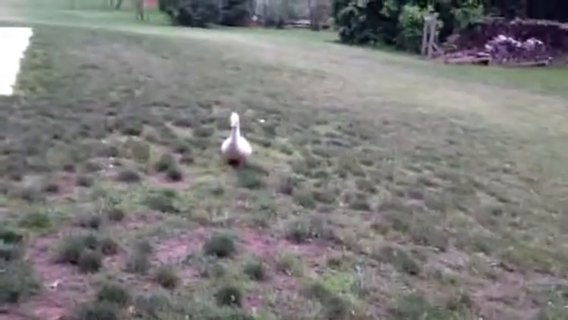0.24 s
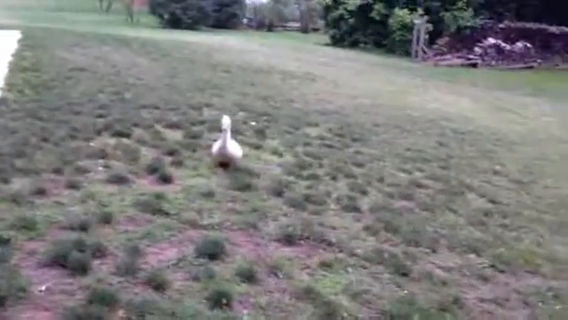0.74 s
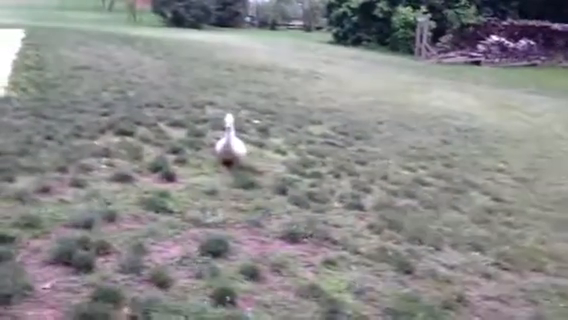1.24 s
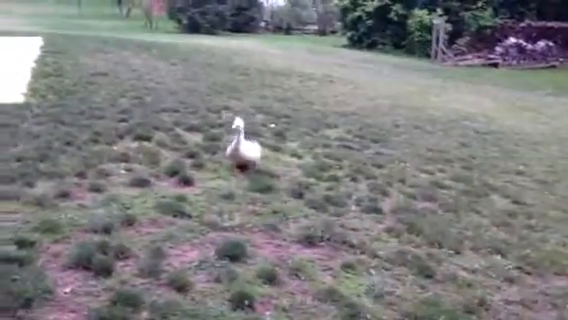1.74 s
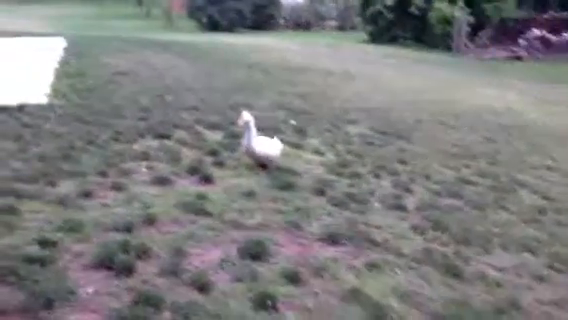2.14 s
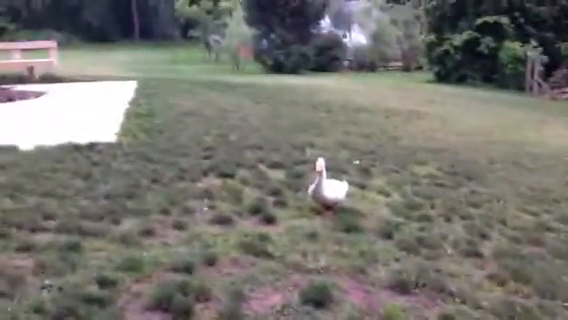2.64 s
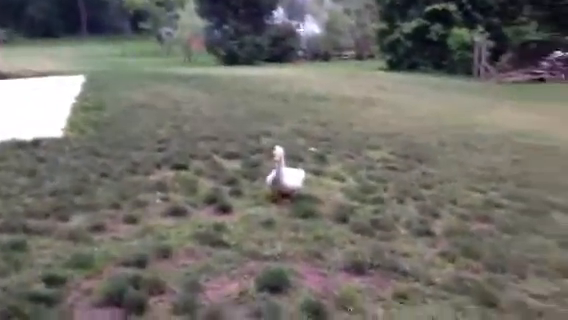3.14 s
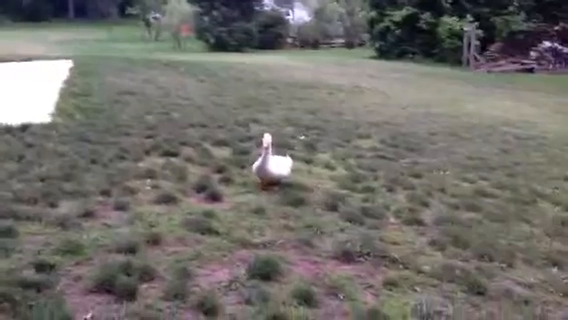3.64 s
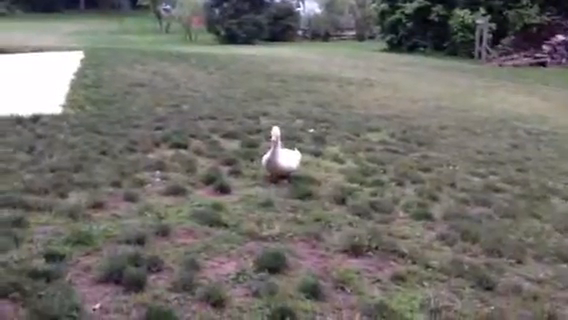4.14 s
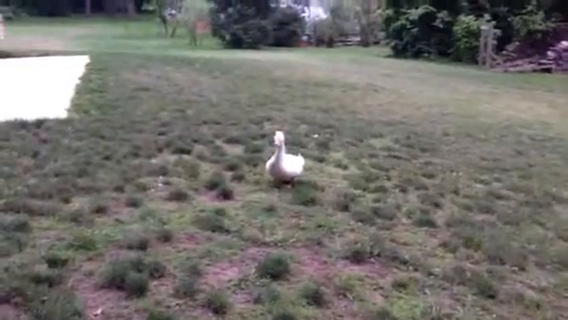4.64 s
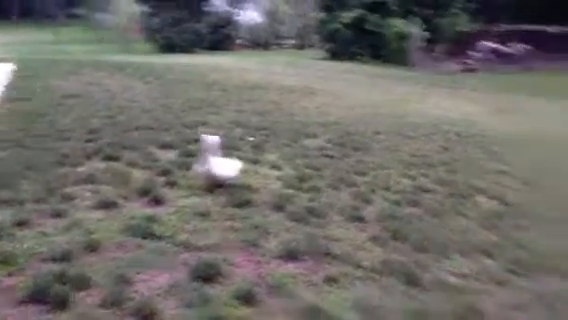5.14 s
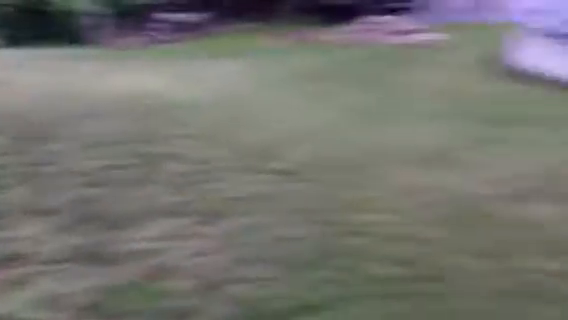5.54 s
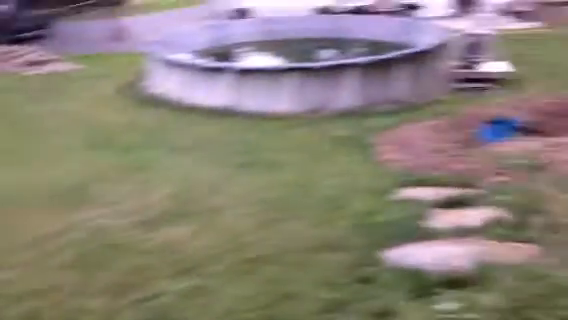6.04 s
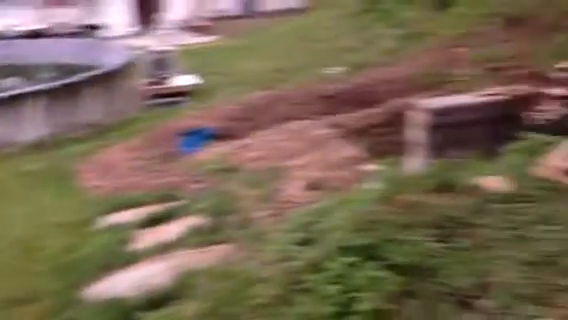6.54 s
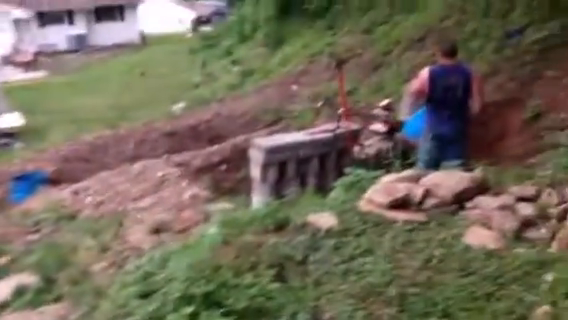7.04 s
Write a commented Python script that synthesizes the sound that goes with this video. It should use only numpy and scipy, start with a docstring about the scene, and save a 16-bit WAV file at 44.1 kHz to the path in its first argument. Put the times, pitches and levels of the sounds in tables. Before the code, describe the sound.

Six evenly spaced, rasping duck quacks outdoors, mixed with scattered tool clacks, light taps and dull bumps over a low rumble.

```python
"""A white duck on a lawn gives six long, rasping quacks: slow pulses from its syrinx ring the throat,
and the tone brightens as the bill opens. The last is heard from aside, duller, its pulses more smeared.
Work in the yard adds sharp clacks that echo off the houses; light ticks and a few dull, close bumps
stay dry. Underneath is a bed of low outdoor rumble, rustling leaves, a machine's hum and microphone
hiss, with faint songbirds and a soft drone that swells midway."""
import sys
import numpy as np
from scipy import signal
from scipy.fft import rfft, irfft, next_fast_len
from scipy.io import wavfile
from scipy.ndimage import uniform_filter1d, map_coordinates

SR = 44100
rng = np.random.default_rng(int(sys.argv[2]) if len(sys.argv) > 2 else 0)


def wav_out(sig):
    """Save sig, one row per channel (or a flat mono array), as 16-bit PCM at SR to the path in sys.argv[1]."""
    wavfile.write(sys.argv[1], SR, np.round(np.clip(np.atleast_2d(sig).T, -1, 1) * 32767).astype(np.int16))


N = 321489

# Tone of the rumble, the leaves and the hiss. Each row: frequency in Hz, relative level in dB.
RUMBLE_SPECTRUM = [(15, -60), (25, -36), (86, -18.5), (99, -14.5), (119, 1), (145, -1), (172, -7.5),
                   (300, -1.5), (350, -9), (421, -5.5), (484, -12), (1000, -25.5), (1300, -59),
                   (2200, -120)]
LEAF_SPECTRUM = [(500, -13), (900, 1), (1700, 2.5), (2500, 2.5), (3800, 0.5), (5000, 1), (7000, -4.5),
                 (12000, -13.5)]
HISS_SPECTRUM = [(100, 6), (3000, -26), (8000, -4.5), (15000, -3.5)]
# Slow fader rides for the rumble and the leaves. Each row: time in seconds, fader level in dB.
RUMBLE_RIDE = [(0.0, -61), (0.55, -55.5), (1.26, -65), (1.52, -63), (1.68, -59.5), (1.95, -59), (2.46, -64),
               (3.39, -61), (3.65, -64), (4.12, -61), (5.04, -61.5), (5.32, -65), (5.56, -62), (6.21, -58),
               (6.56, -62), (7.29, -60.5)]
LEAF_RIDE = [(0, -72), (.7, -65), (1.4, -69.5), (2.6, -66), (3.15, -69.5), (4.1, -69), (5.1, -66),
             (5.45, -69.5), (6.3, -68), (7.29, -65)]
# The machine's hum. Each row: frequency in Hz, level in dB.
HUM_PARTIALS = [(120.3, -67.5), (180.5, -73)]

# Tool blows. Each row: start in seconds, peak in dB, tuning ratio of the body, relative treble in dB,
# steel ring in dB, frequency in Hz where the steel rings most, echo send in dB.
CLACK_HITS = [(.003, -44.5, 1.14, 8, -13, 3000, 3), (2.3799, -27.5, 1.025, 5, -18, 3200, 1),
              (3.271, -52, 1.0, -5, -27, 3000, -7), (4.353, -47.5, 1.01, 3.5, -15, 3000, 11.5),
              (4.364, -39.5, 1.29, 4, -30, 3000, -8), (4.957, -40.5, 1.2, -2, -23, 3000, -4),
              (5.097, -41, 1.05, -1, -30, 3000, -7.5), (5.171, -47.5, 0.79, 0, -25, 3000, -8),
              (6.475, -39, 1.37, 12, 0, 2800, 1), (6.493, -34.5, 1.07, 19, -12, 5000, -2),
              (6.531, -37, 1.26, 9, 2.5, 5600, -2.5)]
# Body and bright crack of the struck thing. Each row: frequency in Hz, width in Hz, level in dB.
BODY_MODES = [(576, 200, 3.5), (1550, 830, 1.5), (1955, 260, 16.5), (3250, 450, 7), (4570, 520, -11)]
CRACK_MODES = [(2620, 3900, 7), (4900, 600, 0.5), (6200, 390, -0.5), (8800, 1600, -57)]
# Ring of the steel tool. Each row: frequency in Hz, level in dB, seconds to fall 60 dB.
STEEL_MODES = [(2537, -14, 0.13), (3250, 1, 0.067), (5500, -7, 0.067)]
# The yard's reverb tail. Each row: frequency in Hz, seconds to fall 60 dB.
YARD_DECAY = [(200, 0.49), (2000, 0.39), (5000, 0.44), (10000, 0.18)]

# Songbird phrases on one repeated note. Each row: start in seconds, note count, spacing in seconds,
# note length in seconds, opening pitch in Hz, closing pitch in Hz, level in dB.
BIRD_PHRASES = [(0.062, 1, 0, 0.057, 1820, 1650, -66), (1.27, 1, 0, 0.026, 5220, 5480, -61.5),
                (3.997, 1, 0, 0.18, 3550, 3950, -69.5), (6.006, 1, 0, .17, 1805, 1500, -66),
                (6.153, 3, 0.042, .03, 4900, 4510, -65.5), (6.73, 3, 0.033, 0.027, 4910, 4380, -61.5),
                (6.468, 4, 0.24, 0.038, 1820, 2025, -57.5), (6.798, 2, .243, .052, 3000, 2380, -57.5)]

# Small dry taps. Each row: start in seconds, peak in dB, pitch in Hz, click against ring in dB.
TICK_HITS = [(.508, -54.5, 850, -21.5), (.630, -49, 1140, -5), (1.175, -43, 1060, 1.5),
             (1.616, -48.5, 980, 0), (2.591, -47, 1256, -2), (3.525, -47.5, 1090, 0),
             (5.454, -48.5, 1670, 4), (6.208, -53, 960, -9), (6.495, -33.5, 1010, -3),
             (6.732, -48, 1280, -14), (6.798, -49, 1290, -16), (6.92, -52, 1352, -16),
             (7.0996, -33, 914, -14), (7.162, -38.5, 1420, -6.5)]
# A tick's ring. Each row: multiple of its pitch, width in Hz, level in dB.
TICK_RING = [(1, 230, 3.5), (1.57, 290, -2)]
# A tick's contact click. Each row: frequency in Hz, width in Hz, level in dB.
CLICK_MODES = [(2600, 1100, 3), (4330, 2400, -3)]

# The duck's calls. Each row: start in seconds, length in seconds, level in dB, bill opening time in
# seconds, wide-open brightness in dB, rasp in dB, top pulse rate in Hz, boost of the lowest throat mode
# in dB, wide-open throat boost in dB, 1 for facing us or 0 for aside.
QUACK_CUES = [(0.648, .44, -40.5, 0.19, -1.5, -8.5, 91.03, 6, 0.5, 1),
              (1.659, .46, -41, .18, -2.5, -8, 93.44, 3, 1, 1),
              (2.621, .448, -39.5, .18, -2.5, -6, 91.9, -1, 1, 1),
              (3.541, 0.39, -39, 0.18, -3, -7.5, 92.3, 0.5, 0, 1),
              (4.47, 0.43, -39.5, .205, -3.5, -7.5, 91.84, 1, 0, 1),
              (5.472, 0.49, -42, 0.17, -5, -11, 102, 0, -3, 0)]
# Resonances of the throat, the open bill and the windpipe's high rasp, the last two from the front
# and from aside. Each row: frequency in Hz, width in Hz, level in dB.
THROAT_MODES = [(1213, 91, -5.5), (1439, 186, 3.5), (1787, 114, 6.5)]
BILL_FRONT_MODES = [(2236, 51, 2), (2426, 275, 1), (2828, 136, -1.5), (3300, 165, -11)]
BILL_ASIDE_MODES = [(2150, 300, -8.5), (2454, 130, -10), (2876, 180, -3.5), (3340, 270, -7)]
RASP_FRONT_MODES = [(3960, 200, -4), (4500, 310, 5.5), (4926, 230, -2.5), (5720, 400, -15),
                    (7750, 3200, -33)]
RASP_ASIDE_MODES = [(4580, 490, 7), (4960, 365, -12)]

# Dull, close bumps. Each row: start in seconds, peak in dB, pitch in Hz.
BUMP_HITS = [(1.175, -45.5, 190), (2.381, -38, 520), (2.396, -38.5, 195), (3.318, -47, 157),
             (4.367, -40, 320), (4.971, -41, 249), (6.498, -26.5, 213), (7.099, -38, 217)]
# The low drone. One row: crest time and spread in seconds, centre and width in Hz, crest level in dB.
DRONE_BAND = (4, 1.1, 166.5, 26, -63.5)


def amp(db):
    """Decibels to gain."""
    return 10 ** (np.asarray(db) / 20)


def unit(x):
    """Normalise to rms 1."""
    return x / np.sqrt(np.mean(x ** 2) + 1e-20)


def peaked(x):
    """Normalise to peak 1."""
    return x / np.abs(x).max()


def along(points, hz):
    """Read (Hz, value) points on a log frequency axis."""
    freqs, values = np.transpose(points)
    return np.interp(np.log(hz + 1), np.log(freqs), values)


def wobble(rate):
    """Smooth random modulation with `rate` knots a second."""
    knots = rng.standard_normal(int(N * rate / SR) + 4)
    return map_coordinates(knots, [np.arange(N) * rate / SR])


def filtered(x, response):
    """EQ a track with a gain that is a function of frequency."""
    size = next_fast_len(N + SR // 4)
    return irfft(rfft(x, size) * response(np.fft.rfftfreq(size, 1 / SR)), size)[:N]


def noise(spectrum):
    """Coloured noise at rms 1."""
    return unit(filtered(rng.standard_normal(N), lambda hz: amp(along(spectrum, hz))))


def resonate(x, modes, size=4096):
    """Ring x through steep-sided resonances, each given as (Hz, width in Hz, dB)."""
    f = np.fft.rfftfreq(size, 1 / SR)
    gain = sum(amp(db) * (f * width) ** 2 / ((hz * hz - f * f) ** 2 + (f * width) ** 2)
               for hz, width, db in modes)
    # minimum phase, so nothing rings ahead of the hit
    cepstrum = irfft(np.log(gain + 1e-4))
    cepstrum[1:size // 2] *= 2
    cepstrum[size // 2 + 1:] = 0
    return signal.fftconvolve(x, irfft(np.exp(rfft(cepstrum))))[:len(x)]


def burst(t60, size=4096):
    """Contact noise that falls 60 dB in t60 seconds."""
    return rng.standard_normal(size) * amp(-60 * np.arange(size) / SR / t60)


def add(track, start, sound):
    """Mix a sound into the track, `start` seconds in."""
    part = track[max(0, round(start * SR)):][:len(sound)]
    part += sound[:len(part)]


def outdoor_bed(rumble_trim_db=-0.25, hiss_db=-70):
    """Swelling rumble, fluttering leaves, a machine's slightly drifting hum and microphone hiss."""
    t = np.arange(N) / SR
    rumble_db = np.interp(t, *np.transpose(RUMBLE_RIDE)) + rumble_trim_db
    rumble = amp(rumble_db + 1.64 * wobble(13)) * noise(RUMBLE_SPECTRUM)
    leaves_db = np.interp(t, *np.transpose(LEAF_RIDE))
    leaves = amp(leaves_db + 1.27 * wobble(22)) * noise(LEAF_SPECTRUM)
    drifting_t = t + 0.00016 * wobble(3.28)
    hum = np.sqrt(2) * sum(amp(db) * np.sin(2 * np.pi * hz * drifting_t) for hz, db in HUM_PARTIALS)
    hum *= amp(1.2 * wobble(1.3))
    return rumble + leaves + hum + amp(hiss_db) * noise(HISS_SPECTRUM)


def steel_ring(favoured_hz, fall_db_per_octave=4):
    """The tool's steel rings briefly; modes far from the frequency a blow favours ring less."""
    t = np.arange(4096) / SR
    ring = np.zeros(len(t))
    for hz, db, t60 in STEEL_MODES:
        struck_db = db - fall_db_per_octave * abs(np.log2(hz / favoured_hz))
        ring += amp(struck_db - 60 * t / t60) * np.sin(2 * np.pi * hz * t)
    return unit(ring)


def clacks(crack_trim_db=-8.5):
    """Hard tool blows layer body, crack and steel ring, and echo around the yard."""
    direct, send = np.zeros(N), np.zeros(N)
    for start, db, tuning, treble_db, steel_db, favoured_hz, echo_db in CLACK_HITS:
        modes = [(hz * tuning, width, level) for hz, width, level in BODY_MODES]
        body = unit(resonate(burst(t60=.035), modes))
        crack = amp(treble_db + crack_trim_db) * unit(resonate(burst(t60=.04), CRACK_MODES))
        steel = amp(steel_db) * steel_ring(favoured_hz)
        blow = amp(db) * peaked(body + crack + steel)
        add(direct, start, blow)
        add(send, start, amp(echo_db) * blow)
    return direct + yard_echo(send)


def yard_echo(send, build_s=0.0059):
    """Houses and trees return a diffuse tail, each frequency dying at its own speed."""
    hz, t, spectrum = signal.stft(rng.standard_normal(SR // 2), SR, nperseg=256)
    decay = amp(-60 * t / along(YARD_DECAY, hz)[:, None])
    fade_in = 1 - np.exp(-t / build_s)
    _, tail = signal.istft(spectrum * decay * fade_in, SR, nperseg=256)
    return signal.fftconvolve(send, tail / np.linalg.norm(tail))[:N]


def songbirds(waver=0.016):
    """Distant whistled glides, single or evenly repeated, a little unsteady in pitch."""
    out = np.zeros(N)
    unsteady = 1 + waver * wobble(180)
    for first, count, spacing, length, start_hz, end_hz, db in BIRD_PHRASES:
        progress = np.linspace(0, 1, round(length * SR))
        glide = start_hz + (end_hz - start_hz) * progress
        envelope = amp(db) * np.sin(np.pi * progress)
        for start in first + spacing * np.arange(round(count)):
            pitch = glide * np.resize(unsteady[round(start * SR):], len(glide))
            add(out, start, envelope * np.sin(2 * np.pi * np.cumsum(pitch) / SR))
    return out


def ticks():
    """Light dry taps: a contact click on top of a short pitched ring."""
    out = np.zeros(N)
    for start, db, hz, click_db in TICK_HITS:
        modes = [(hz * multiple, width, level) for multiple, width, level in TICK_RING]
        click = peaked(resonate(burst(t60=.03), CLICK_MODES))
        ring = peaked(resonate(signal.unit_impulse(len(click)), modes))
        add(out, start, amp(db) * peaked(ring + amp(click_db) * click))
    return out


def bill_gape(t, length, open_s, curve=2.4, shut_lead_s=.068, shut_s=.01096):
    """The bill, from 0 shut to 1 wide: it eases open and snaps shut just before the quack ends."""
    opening = 1 - np.exp(-(t / open_s) ** curve)
    return opening / (1 + np.exp((t - length + shut_lead_s) / shut_s))


def resonance_bend(t, length, gape, scoop_s=.028, sag_s=.04):
    """Tuning ratio of the duck's resonances: they scoop up, lift with the gape and sag at the end."""
    scoop = .19 * np.exp(-t / scoop_s)
    lift = .0058 * (gape - .5)
    sag = .24 * np.exp(np.minimum(t - length, 0) / sag_s)
    waver = .008 * wobble(16)[:len(t)]
    return 1 + lift - scoop - sag + waver


def syrinx(rate_hz, jitter_s=.0005, scatter_db=1):
    """The membranes snap once a cycle, unevenly; gives each snap's sample index and strength."""
    cycles = np.flatnonzero(np.diff(np.floor(np.cumsum(rate_hz) / SR + .5)))
    shift, strength = rng.standard_normal((64, 2))[:len(cycles)].T
    snaps = cycles + (jitter_s * SR * shift).astype(int)
    return np.clip(snaps, 0, len(rate_hz) - 1), amp(scatter_db * strength)


def voice_layer(pulses, modes, rough, puff_s, smear, lag_s):
    """Snaps and their turbulent puffs ring a group of resonances; `smear` fills the gaps with noise."""
    age = np.arange(-SR // 200, SR // 200) / SR
    puffs = signal.fftconvolve(pulses, np.exp(-(age / puff_s) ** 2), "same")
    air = (puffs + smear) * rng.standard_normal(len(pulses))
    air_share = np.clip(rough, 0, 1)
    tone = np.sqrt(1 - air_share) * unit(resonate(pulses, modes))
    breath = np.sqrt(air_share) * unit(resonate(air, modes))
    sound = tone + breath
    # the steady push of air evens out the strength over a few cycles
    power = uniform_filter1d(uniform_filter1d(sound ** 2, SR // 42), SR // 80)
    sound /= np.sqrt(np.abs(power) + .08)
    return np.pad(sound, (round(lag_s * SR), 0))[:len(pulses)]


def air_push(t, length, attack_s=.024, swell_db_per_s=2, release_s=.089):
    """The breath behind a quack, as a gain: quick attack, slow swell, release and a light flutter."""
    attack_db = -22.5 * np.exp(-t / attack_s)
    swell_db = swell_db_per_s * (t - length / 2)
    release_db = -28.5 * np.clip((t - length) / release_s + 1, 0, None) ** 1.82
    flutter_db = .93 * wobble(28.8)[:len(t)]
    return amp(attack_db + swell_db + release_db + flutter_db)


def quack(length, open_s, wide_db, rasp_db, top_rate_hz, low_db, wide_throat_db,
          bill_modes, rasp_modes, smear, shut_db=-23.5, shut_rate_hz=73.7, rasp_growth=.69, size=24576):
    """One quack: as the bill opens, the voice pulses faster and turns rougher and brighter."""
    t = np.arange(size) / SR
    gape = bill_gape(t, length, open_s)
    bright_db = shut_db + (wide_db - shut_db) * gape
    rate_hz = shut_rate_hz + (top_rate_hz - shut_rate_hz) * gape
    # a varispeed clock bends the resonances while the snaps keep their timing
    clock = np.cumsum(resonance_bend(t, length, gape))
    snaps, strength = syrinx(rate_hz)
    pulses = np.bincount(clock[snaps].astype(int), strength, size)[:size]
    throat_rough = .33 + .7 * np.interp(np.arange(size), clock, amp(bright_db))
    (hz, width, db), *upper = THROAT_MODES
    throat_modes = [(hz, width, db + low_db), *upper]
    # within each cycle the low throat speaks first, the bill and the rasp just after
    throat = voice_layer(pulses, throat_modes, throat_rough, puff_s=.0018, smear=smear + .12, lag_s=0)
    bill = voice_layer(pulses, bill_modes, rough=.88, puff_s=.0014, smear=smear, lag_s=.0018)
    rasp = voice_layer(pulses, rasp_modes, rough=.92, puff_s=.0017, smear=smear + .05, lag_s=.0021)
    mix = [(throat, wide_throat_db * gape), (bill, bright_db), (rasp, rasp_db + rasp_growth * bright_db)]
    voice = sum(amp(gain_db) * map_coordinates(layer, [clock]) for layer, gain_db in mix)
    return air_push(t, length) * voice * signal.windows.tukey(size, .02)


def duck():
    """Six quacks; the last is heard from aside, duller, with its pulses more smeared."""
    out = np.zeros(N)
    for start, length, db, *voicing, facing in QUACK_CUES:
        if round(facing):
            call = quack(length, *voicing, BILL_FRONT_MODES, RASP_FRONT_MODES, smear=.29)
        else:
            call = quack(length, *voicing, BILL_ASIDE_MODES, RASP_ASIDE_MODES, smear=.44)
        add(out, start, amp(db) * call)
    return out


def bumps(width_ratio=0.58, puff_db=-12):
    """Soft, heavy contacts: a thump of a few low cycles with a dull puff."""
    out = np.zeros(N)
    for start, db, hz in BUMP_HITS:
        puff = peaked(resonate(burst(t60=.14), [(180, 94, -0.5), (470, 420, -12)]))
        thump = peaked(resonate(signal.unit_impulse(len(puff)), [(hz, width_ratio * hz, 0)]))
        add(out, start, amp(db) * peaked(thump + amp(puff_db) * puff))
    return out


def drone():
    """A narrow band of rumble fades up midway and away again."""
    crest_s, spread_s, hz, width, db = DRONE_BAND
    t = np.arange(N) / SR
    band = unit(filtered(rng.standard_normal(N), lambda f: np.exp(-((f - hz) / width) ** 2)))
    return amp(db) * np.exp(-((t - crest_s) / spread_s) ** 2) * band


def scene(duck_send_db=-25.5, bird_send_db=-9):
    """The lawn in mono: the duck nearly dry up front, the songbirds set back in the yard's echo."""
    quacks, song = duck(), songbirds()
    echoes = yard_echo(amp(duck_send_db) * quacks + amp(bird_send_db) * song)
    return (quacks + song + echoes + clacks() + bumps() + ticks() + outdoor_bed() + drone())[None]


def record(dry, low_cut_hz=45, top_hz=15400):
    """A small microphone rolls off the deep bass, and a hard band limit cuts the very top."""
    return filtered(dry[0], lambda hz: (hz < top_hz) * (1j * hz / (low_cut_hz + 1j * hz)) ** 2)[None]


dry = scene()
out = record(dry)
wav_out(out)
```